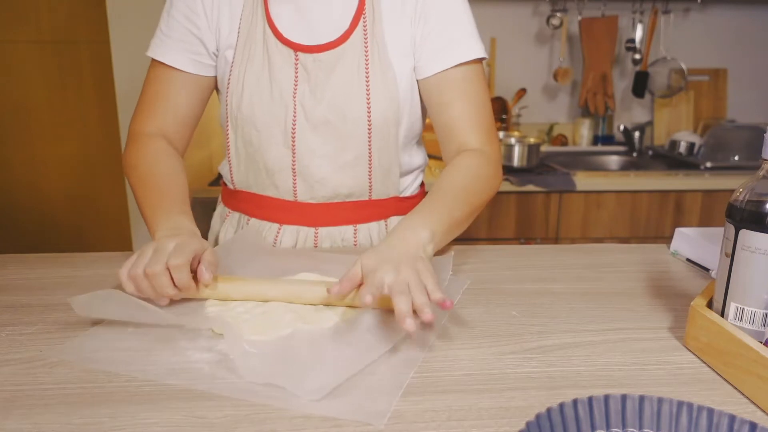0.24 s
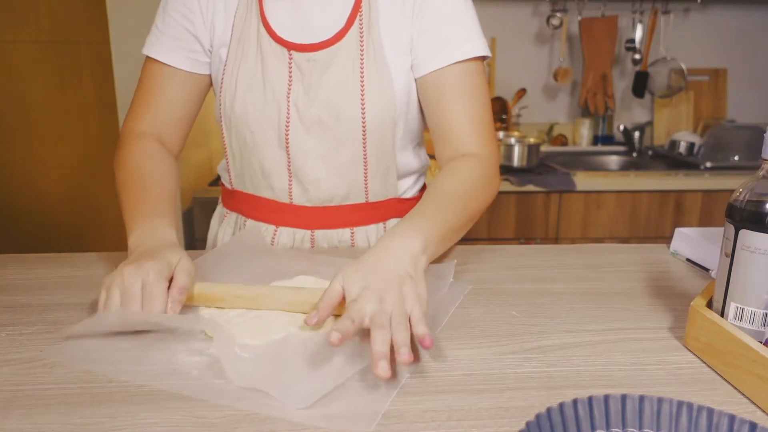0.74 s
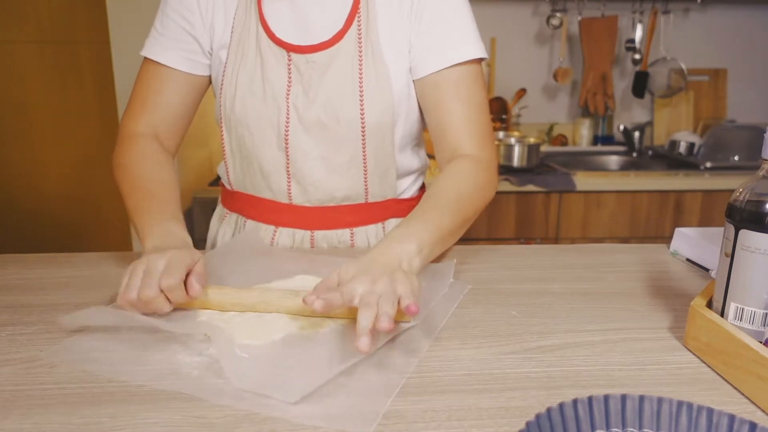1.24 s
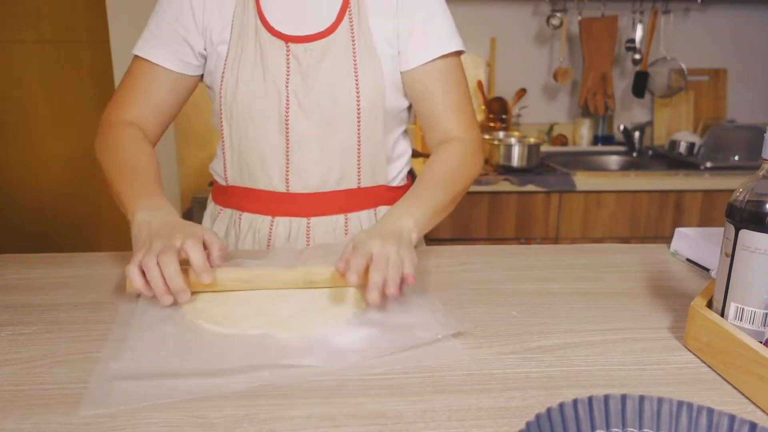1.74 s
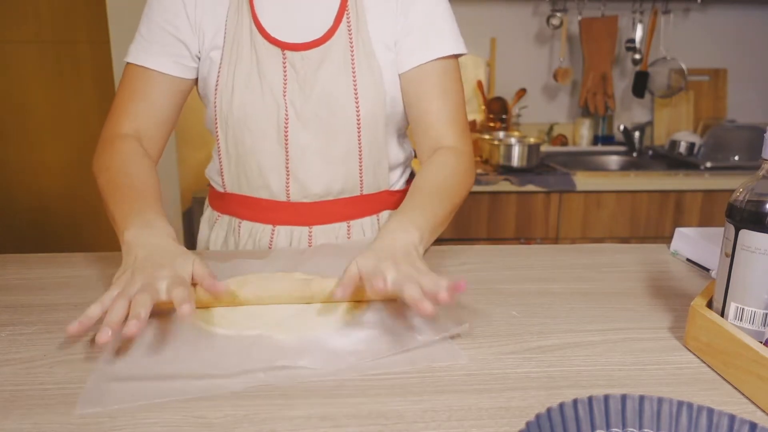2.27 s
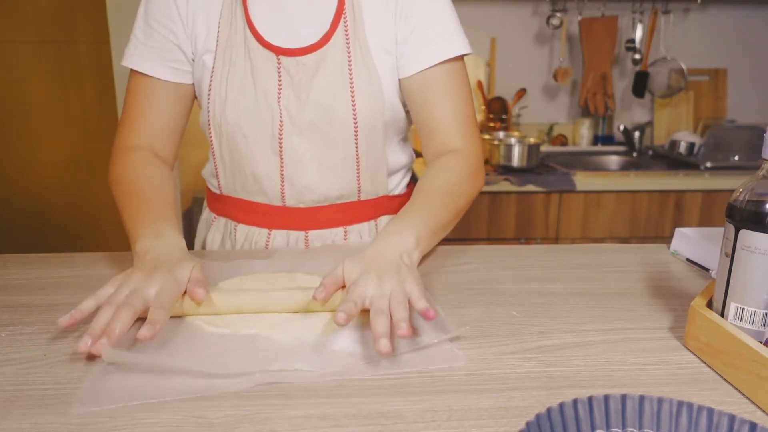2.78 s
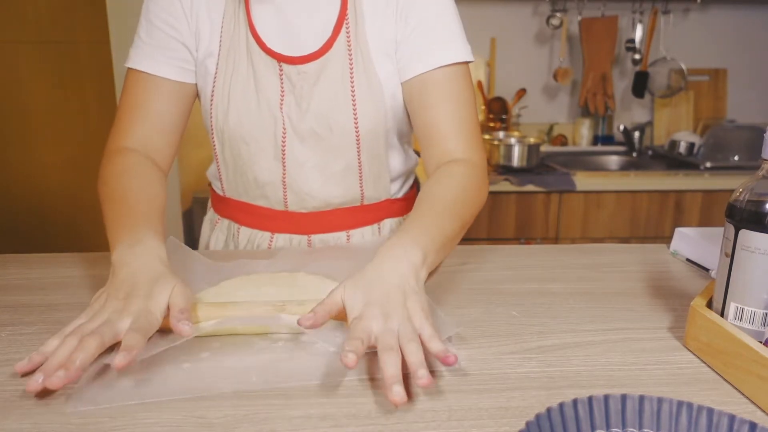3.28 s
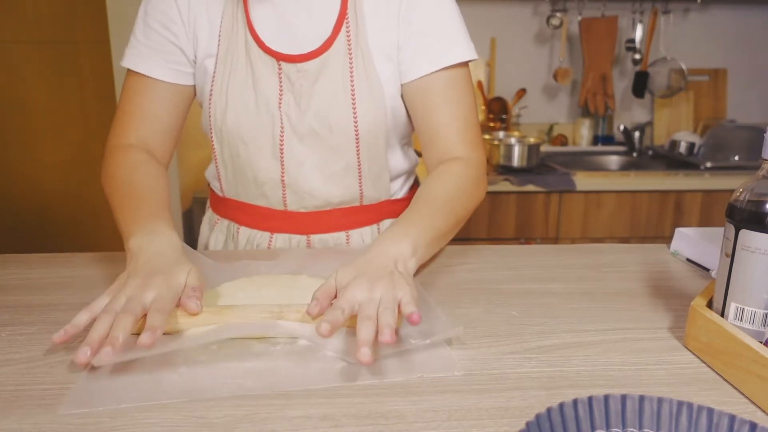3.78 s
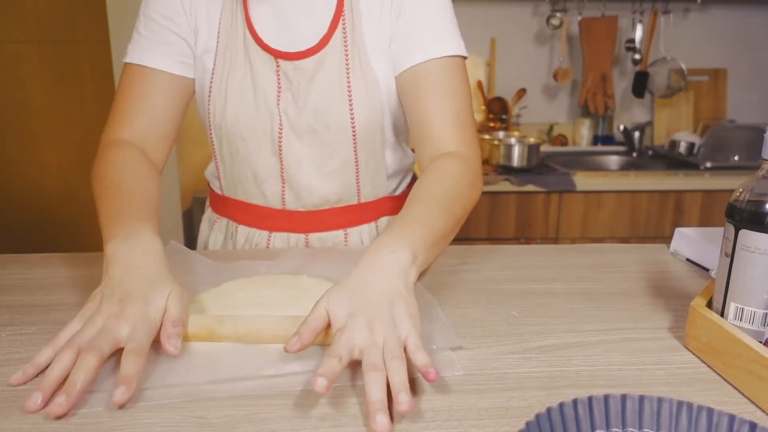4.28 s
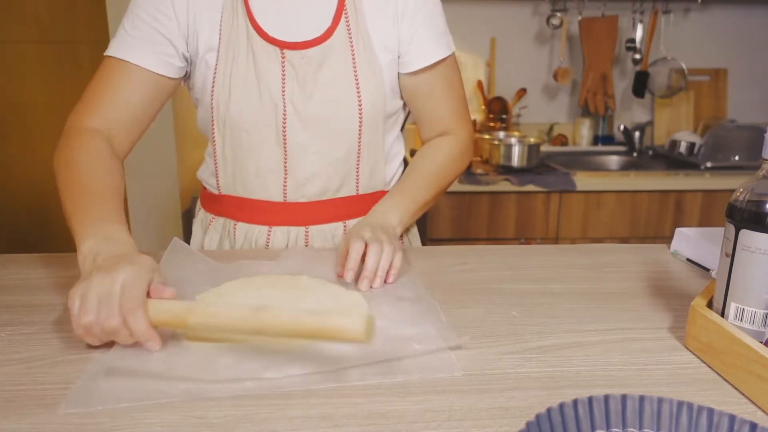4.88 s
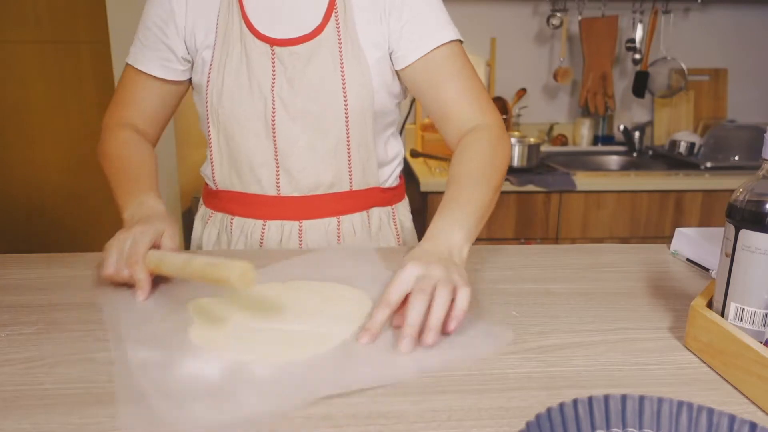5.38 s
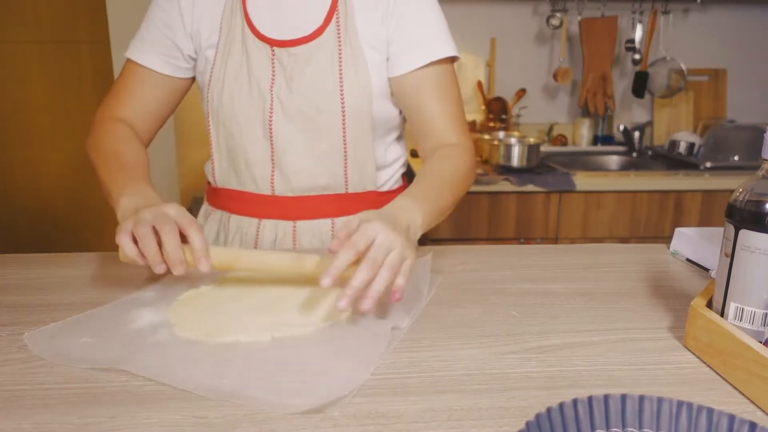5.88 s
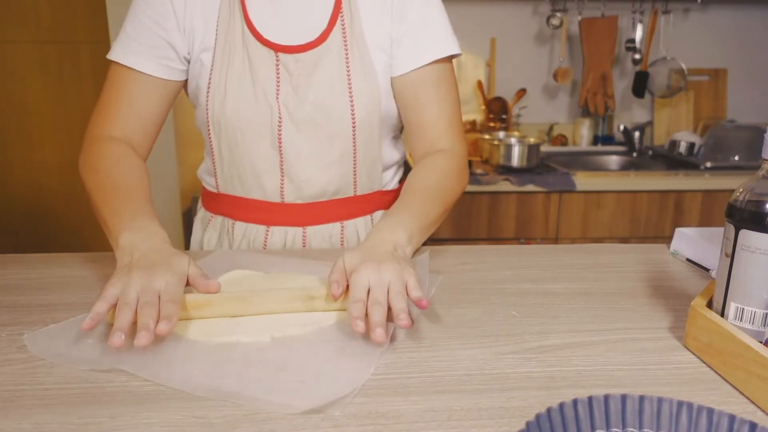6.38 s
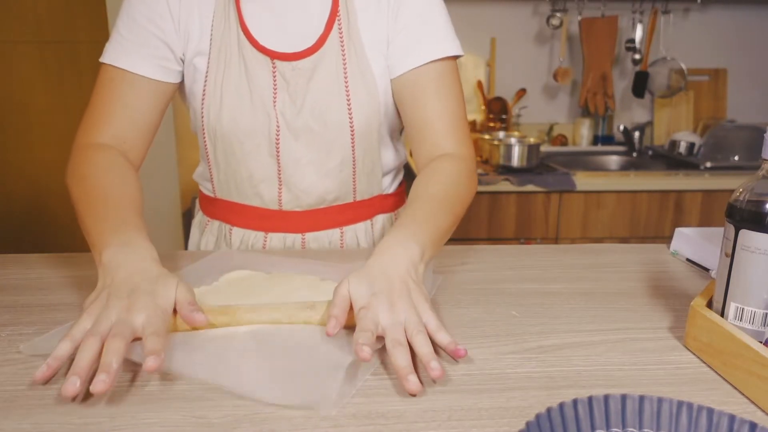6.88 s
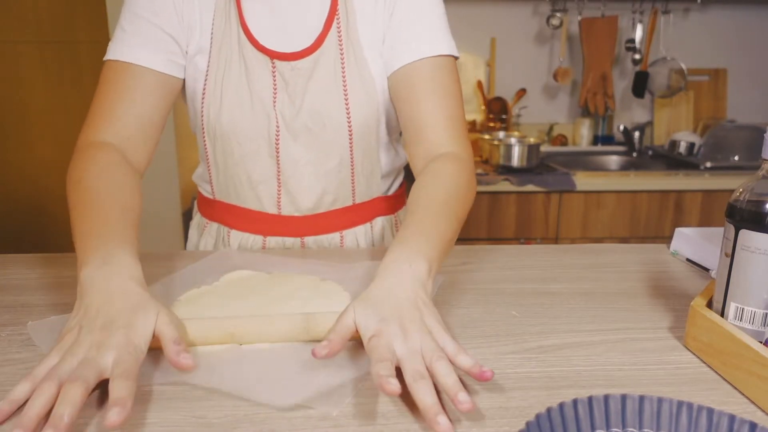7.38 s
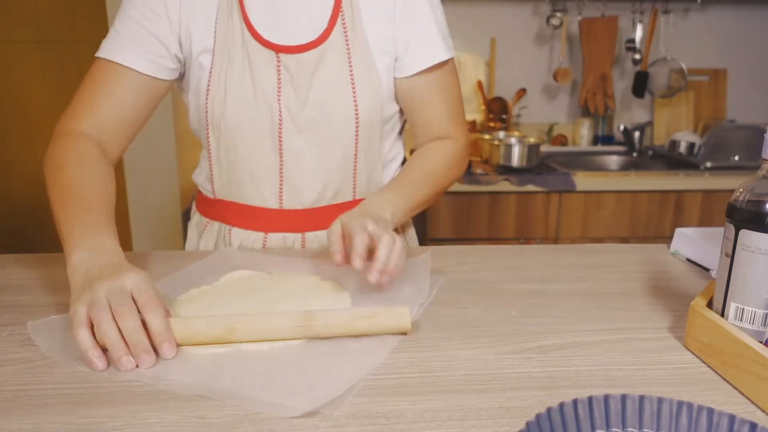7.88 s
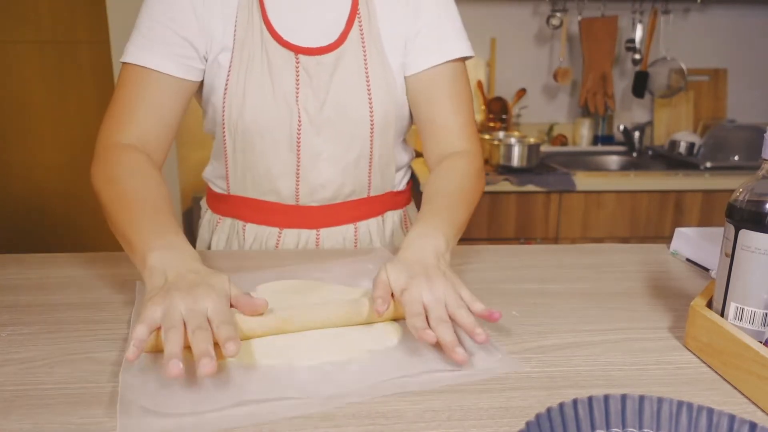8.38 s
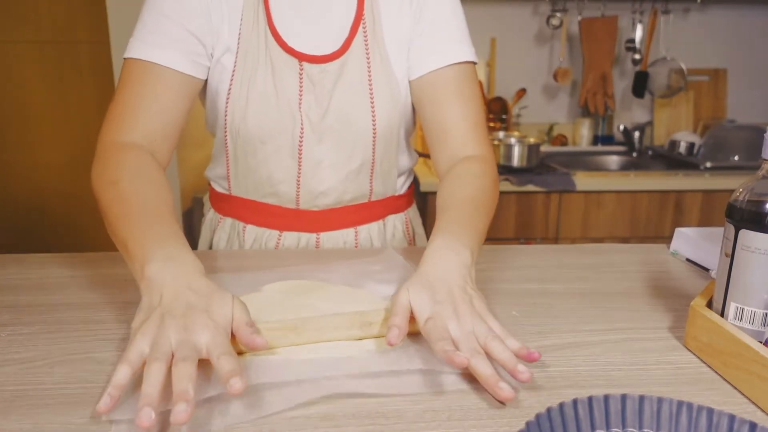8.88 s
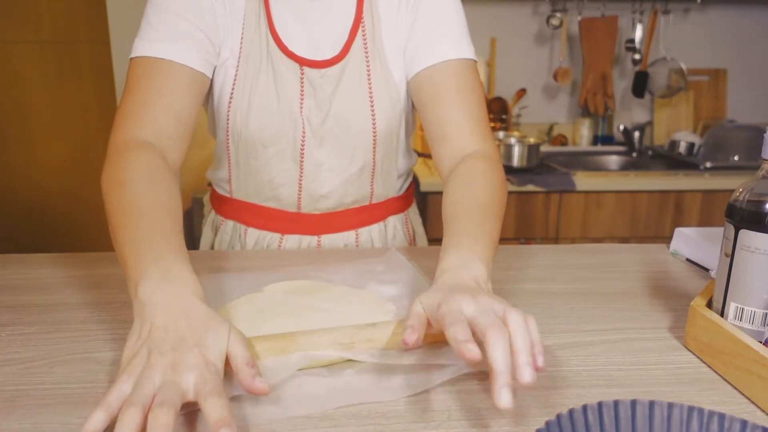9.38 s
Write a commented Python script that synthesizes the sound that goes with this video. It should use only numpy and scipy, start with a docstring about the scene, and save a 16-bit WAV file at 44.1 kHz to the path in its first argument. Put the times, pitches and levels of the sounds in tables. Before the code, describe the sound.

A wooden pin rolls over paper-covered dough in a small kitchen. Paper pops and crinkles in clusters with each push, with near pauses between. Dull padded thumps mark the pin being set down, then the sheet glides across the counter in a rising hiss. Rolling resumes with stronger snaps, a hard woody clack and a rattling stick-slip near the end. Close microphone, short room reflections, steady faint fridge hum underneath.

```python
"""On a kitchen counter, dough is rolled out between sheets of baking paper.
The paper crinkles from small creases, snaps as larger ones buckle, and hisses under hands and in a slide.
The wooden pin rings the counter as it lands, rings itself when knocked, and judders in short runs.
Reflections of a small live kitchen answer; steady filtered noise rumbles and a refrigerator hums in sines."""
import sys
import numpy as np
from scipy import signal
from scipy.fft import rfft, irfft
from scipy.io import wavfile

SR = 44100
rng = np.random.default_rng(int(sys.argv[2]) if len(sys.argv) > 2 else 0)


def int16_out(signal):
    """Quantize to a 16-bit WAV file."""
    q = np.round(np.clip(np.atleast_2d(signal).T, -1, 1) * 32767)
    wavfile.write(sys.argv[1], SR, q.astype(np.int16))


N = 425116
TIME = np.arange(N) / SR


def from_db(db):
    """Decibels to gain."""
    return np.exp(np.asarray(db) * np.log(10) / 20)


def rms_one(x):
    """Scale to an rms of 1."""
    return x / np.sqrt(np.mean(x ** 2) + 1e-20)


def at_hz(points, hz):
    """Read a spectrum on a log-frequency axis."""
    f, value = np.transpose(points)
    return np.interp(np.log(np.maximum(hz, 1)), np.log(f), value)


def butter(x, hz, kind, order=2):
    """Causal Butterworth filter."""
    edge_hz = np.clip(hz, 10, .48 * SR)
    sos = signal.butter(order, edge_hz, kind, fs=SR, output="sos")
    return signal.sosfilt(sos, x + 1e-18)


def colour(x, spectrum, size=8192):
    """Minimum-phase filter of the given spectrum: nothing sounds early."""
    bin_hz = np.arange(size // 2 + 1) * SR / size
    cepstrum = irfft(np.log(from_db(at_hz(spectrum, bin_hz))))
    # fold the cepstrum onto its causal half
    cepstrum[1:size // 2] *= 2
    cepstrum[size // 2 + 1:] = 0
    impulse = irfft(np.exp(rfft(cepstrum)))
    return signal.oaconvolve(x, impulse)[:len(x)]


def drift(rate_hz, size=32):
    """Slow chance with a spread of 1, drawn every size samples after a run-in."""
    slow = butter(rng.standard_normal(2 * N // size), rate_hz * size, "low")[N // size:]
    return np.interp(np.arange(N) / size, np.arange(len(slow)), rms_one(slow))


def add(out, start_s, sound):
    """Mix a sound in from start_s."""
    i = max(int(start_s * SR), 0)
    out[i:i + len(sound)] += sound[:N - i]


def decay(kicks, fall_s):
    """Each kick starts an exponential decay."""
    return signal.lfilter([1], [1, -np.exp(-1 / (fall_s * SR))], kicks + 1e-18)


def swell(top_s, rise_s, fall_s):
    """Grows towards top_s and dies away after it; top 1."""
    distance = np.maximum((top_s - TIME) / rise_s, (TIME - top_s) / fall_s)
    return np.exp(-np.minimum(distance, 20))


def ring(clicks, modes):
    """Clicks set decaying sines ringing, neighbours in opposite sign."""
    out = np.zeros(N)
    for k, (hz, db, t60_s) in enumerate(modes):
        r = np.exp(-np.log(1000) / (t60_s * SR))
        w = 2 * np.pi * hz / SR
        mode = signal.lfilter([0, np.sin(w)], [1, -2 * r * np.cos(w), r * r], clicks + 1e-18)
        out += (-1) ** k * from_db(db) * mode
    return out


def grains(per_s, spread_db, clump_db):
    """Tiny fibre slips at random times; their sizes are uneven and swell in clumps; rms 1."""
    out = np.zeros(N)
    born = np.flatnonzero(rng.random(N) < per_s / SR)
    chance = rng.laplace(size=N)[born]
    size_db = spread_db * np.minimum(np.abs(chance), 2.7)
    size_db += clump_db * np.tanh(drift(45)[born])
    out[born] = np.sign(chance) * from_db(size_db)
    return rms_one(out)


def facet(x, hz, width=1.9, order=1):
    """A patch of paper radiates a broad band, the higher the smaller it is."""
    band = butter(x, [hz / width, hz * width], "band", order=order)
    return butter(band, 706, "high")


# Pushes of the pin or a hand flexing the paper. Each row: top in seconds, relative level in dB,
# rise in seconds, fall in seconds, crispness (top over body) in dB.
FLEXES = [(0.0, -33.5, 0.037, 0.026, 9), (0.14, -40, 0.017, 0.027, 1), (0.82, -41, 0.089, 0.16, -2.5),
          (1.44, -37, .07, 0.019, -3), (1.27, -47, .025, 0.025, 4), (1.62, -47, .04, 0.019, 1),
          (1.735, -59, 0.0051, 0.041, -5), (2.0, -47, 0.085, 0.063, 0), (3.022, -35, 0.11, 0.12, 0),
          (3.62, -46.5, 0.024, .1, -8), (3.83, -28, 0.031, 0.054, -14), (4.131, -43.5, 0.12, 0.15, -5.5),
          (4.34, -44.5, 0.041, 0.09, -3), (4.74, -44.5, 0.029, 0.024, 14.5),
          (6.10, -49.5, 0.064, 0.067, -3.5), (6.49, -46, 0.021, 0.028, 1.5), (6.62, -43.5, 0.063, 0.2, 3.5),
          (6.89, -33.5, .05, 0.11, 1.5), (7.291, -33.5, 0.023, 0.015, -1.5), (7.771, -38, 0.0089, .03, 1),
          (7.93, -53, 0.017, 0.11, 15.5), (8.19, -40, 0.061, 0.025, -3.5), (8.47, -51, .06, 0.094, -1),
          (8.66, -45, 0.042, 0.02, -3.5), (8.77, -42, 0.03, 0.047, -5.5), (9.07, -35, 0.071, 0.065, 4.5),
          (9.28, -38.5, 0.054, 0.02, -7), (9.45, -44, 0.05, 0.034, -8), (9.63, -51, 0.019, .03, -2)]
# Hands resting on the pin, paper stirring. Each row: start in seconds, end in seconds.
PRESSES = [(0, 1.66), (1.72, 2.3), (2.76, 3.3), (3.6, 5.0), (5.98, 7.5), (7.76, 9.64)]
PRESS_RELATIVE_DB, PRESS_CRISP_DB = -61.5, 1


def flexing():
    """Stirring of the paper as gains of its body and crisp top; pushes add in power."""
    pressed = sum((TIME >= start_s) & (TIME < end_s) for start_s, end_s in PRESSES)
    body = from_db(PRESS_RELATIVE_DB) ** 2 * pressed
    top = body * from_db(PRESS_CRISP_DB) ** 2
    for top_s, db, rise_s, fall_s, crisp_db in FLEXES:
        power = (from_db(db) * swell(top_s, rise_s, fall_s)) ** 2
        body = body + power
        top = top + power * from_db(crisp_db) ** 2
    return np.sqrt(body), np.sqrt(top)


# Spectrum of crinkling paper. Each row: frequency in Hz, relative level in dB.
PAPER = [(240, -57), (400, -2), (730, -8.5), (949, -3), (1140, -0.5), (1380, -5), (1680, 2), (2150, -4.5),
         (2360, -3.5), (2880, -3), (5960, -5.5), (8760, -10.5), (14100, -22.5), (16000, -23)]


def crinkle(body, top, rubbing_db=-5.5, body_db=1.5, top_db=2.5):
    """Many small creases give way, each on a facet with its own brief ring, over fine rubbing."""
    ticks = 0
    for hz in np.geomspace(1100, 12000, 7):
        fibre_slips = grains(per_s=85, spread_db=5.0, clump_db=5.0)
        flutter = decay(np.abs(fibre_slips), fall_s=0.0021)
        band = facet(flutter * rng.standard_normal(N), hz, width=1.27)
        ticks = ticks + np.sqrt(hz) * rms_one(band)
    rubbing = from_db(rubbing_db) * rng.standard_normal(N)
    paper = colour(rms_one(ticks) + rubbing, PAPER)
    after_snap = settling()
    low = rms_one(butter(paper, 2930, "low", order=3))
    high = rms_one(butter(paper, 3700, "high", order=3))
    low *= from_db(body_db) * np.hypot(body, after_snap)
    high *= from_db(top_db) * np.hypot(top, after_snap)
    return low + high


# Creases snapping through at set times, loud ones and some faint ones. Each row: start in seconds,
# relative level in dB, centre in Hz, flutter relative to the crack in dB.
SNAPS = [(0.009, -14.5, 5070, -12), (0.036, -17, 2610, 3), (0.048, -17, 3260, 1.5), (0.45, -25, 2930, 2.5),
         (0.561, -22.5, 4100, 1), (0.676, -23.5, 2450, -12), (0.739, -6.5, 4100, -35),
         (0.794, -18, 6360, -10), (0.81, -18.5, 2760, -5), (0.836, -20, 4660, -2),
         (0.885, -13.5, 2200, -32), (1.013, -10, 4680, -15), (1.122, -33.5, 1710, -2),
         (1.233, -33, 2280, 14), (1.263, -26, 6200, -8), (1.316, -30, 2400, -12), (1.362, -17, 2840, -5.5),
         (1.375, -11.5, 5500, -11.5), (1.429, -14, 2700, -17), (1.439, -5, 3650, -23),
         (1.467, -3, 6050, -16), (1.479, -18, 6540, 4), (1.503, -16, 1870, -1.5), (1.953, -26, 3380, -4.5),
         (1.999, -22.5, 1620, -10), (2.121, -15.5, 2760, -22), (2.239, -21.5, 3430, -9),
         (2.593, -25, 3220, -24), (2.832, -15.5, 4020, -19), (2.923, -19, 4580, -2),
         (2.967, -11, 4000, -10), (3.1, -12.5, 5130, -9), (3.107, -8.5, 1530, -12), (3.129, -24, 1390, -9),
         (3.221, -11, 1700, -10), (3.205, -20, 4400, -9), (3.417, -19.5, 4000, -28.5),
         (3.601, -15.5, 5800, -16), (3.772, -27.5, 1590, 1), (3.803, -13.5, 1260, -11),
         (3.82, -11, 4700, -7), (3.849, -22, 1710, -9), (3.868, -13.5, 1650, -9), (3.916, -27, 2600, -9),
         (3.957, -16.5, 1150, -19), (3.976, -27, 1780, -1), (4.017, -29.5, 1590, 7), (4.117, -24, 1740, -5),
         (4.272, -7.5, 9600, -14), (4.332, -22, 3630, -11), (4.36, -28, 4400, -5), (4.516, -13, 3350, -8),
         (4.546, -22, 4100, -5), (4.593, -21.5, 6400, -3), (4.973, -20, 5430, -13), (5.022, -17, 6200, -14),
         (5.192, -19, 5000, -10), (5.868, -29.5, 4330, -11), (6.209, -31, 3080, 2),
         (6.314, -34.5, 3440, -5), (6.392, -16, 3450, -11), (6.416, -23.5, 6200, -7),
         (6.488, -26, 6000, -8), (6.553, -18.5, 4420, -9), (6.585, -17, 3370, -2), (6.628, -19, 7490, -12),
         (6.647, -15.5, 4830, -3), (6.707, -18.5, 3400, -6), (6.818, -2.5, 2020, -14),
         (6.841, -12.5, 1830, -6), (6.898, -8, 3100, -8.5), (6.945, -10, 4380, -13), (6.967, -23, 1860, -1),
         (7.147, -5, 6300, -30), (7.166, -9, 7200, -11), (7.235, -24, 4300, 2), (7.29, -17, 4000, -15),
         (7.311, -26, 4900, -12), (7.344, -19, 3880, -1.5), (7.376, -11.5, 5200, -13),
         (7.427, -13.5, 2770, -20), (7.479, -26, 1700, -3.5), (7.911, -23, 6300, -6),
         (8.03, -12.5, 6600, -21), (8.201, -18.5, 2850, 1), (8.26, -14, 1910, -15), (8.348, -15, 6900, -26),
         (8.391, -23.5, 2800, -11), (8.42, -21.5, 2980, -13), (8.454, -11.5, 3500, -15),
         (8.471, -16, 2020, -9), (8.658, -26.5, 1830, -6), (8.774, -20, 1610, -7.5),
         (8.896, -6.5, 4960, -11.5), (8.994, -16.5, 1680, 0.5), (9.027, -9, 4700, -16),
         (9.062, -12, 1640, -5), (9.1, -9.5, 2620, -6.5), (9.14, -6, 2400, -10), (9.569, -19.5, 3840, -16)]


def snaps(stir, crack_s=0.00018, level_db=-3.5, edge_db=-4.5, edge_hz=5500, edge_follows=.4, count=400):
    """A crease buckles with a sharp crack, then its facet flutters for a few milliseconds."""
    out, t = np.zeros(N), TIME[:1024]
    median_hz = np.median(np.array(SNAPS)[:, 2])
    rattles = np.sign(rng.standard_normal((count, 2, len(t))))
    for (s, db, hz, flutter_db), rattle in zip([*SNAPS, *lesser_snaps(stir)], rattles):
        shape = np.exp(-t / crack_s) + from_db(flutter_db) * np.exp(-t / .0022)
        body, edge = rattle * shape
        # a smaller facet also has a higher bright edge
        bright = facet(edge, edge_hz * (hz / median_hz) ** edge_follows, width=1.75)
        crack = rms_one(facet(body, hz, width=1.65, order=2)) + from_db(edge_db) * rms_one(bright)
        # soft limit on each snap's peaks
        limited = 2 * np.tanh(crack * np.sqrt(np.mean(shape ** 2)) / 2)
        add(out, s, from_db(db + level_db) * limited)
    return out


# Chance snaps: levels are on the relative scale of SNAPS; spreads are standard deviations.
LESSER_PER_S, LESSER_ABOVE_STIR_DB, LESSER_SPREAD_DB, LESSER_TOP_DB = 16, 16, 1, -17
LESSER_CENTRE_HZ, LESSER_SPREAD_OCTAVES, LESSER_FLUTTER_DB = 2700, 0.86, -13


def lesser_snaps(stir, count=300):
    """Chance snaps whose strength follows the stirring of the paper; rows like those of SNAPS."""
    when, luck = rng.random((count, 2)).T
    size, pitch = rng.uniform(-1, 1, (count, 2)).T * np.sqrt(3)
    at = (when * N).astype(int)
    db = 20 * np.log10(stir[at]) + LESSER_ABOVE_STIR_DB + LESSER_SPREAD_DB * size
    db = np.minimum(db, LESSER_TOP_DB)
    hz = LESSER_CENTRE_HZ * 2 ** (LESSER_SPREAD_OCTAVES * pitch)
    rows = np.column_stack([at / SR, db, hz, np.full(count, LESSER_FLUTTER_DB)])
    return rows[luck < LESSER_PER_S * N / SR / count]


def settling(below_snap_db=-32, fall_s=0.025):
    """Each listed snap sets off a brief run of crinkling; a gain."""
    kicks = np.zeros(N)
    for s, db, *_ in SNAPS:
        add(kicks, s, from_db([db + below_snap_db]))
    return decay(kicks, fall_s)


def dip_before_snaps(dip_db=-6.5, dip_s=0.008):
    """Crinkling dips just before each listed snap, so its attack stands clear; a gain."""
    next_snap = np.append(np.sort(np.array(SNAPS)[:, 0]), np.inf)
    wait_s = next_snap[np.searchsorted(next_snap, TIME)] - TIME
    return from_db(dip_db * np.exp(-wait_s / dip_s))


# Hands brushing and crushing the paper. Each row: top in seconds, relative level in dB, rise in seconds,
# fall in seconds, centre in Hz.
BRUSHES = [(.03, -35.5, 0.024, 0.15, 3620), (0.739, -32.5, 0.0018, 0.0057, 4350),
           (1.445, -34, 0.0079, 0.011, 4500), (1.7202, -22, 0.0011, 0.0077, 4900),
           (2.995, -30.5, 0.021, 0.019, 3500), (3.744, -26.5, 0.0038, 0.0085, 2230),
           (3.822, -20.5, 0.005, 0.037, 4800), (3.86, -35, 0.0066, 0.012, 3560),
           (4.663, -27.5, 0.0087, 0.016, 4800), (4.722, -35, 0.003, 0.005, 4560),
           (4.748, -25, 0.0053, 0.023, 5270), (5.50, -40, 0.023, 0.017, 1210),
           (5.978, -29, 0.0019, 0.028, 3930), (6.814, -23, 0.0075, 0.0085, 4130),
           (6.882, -26, 0.0049, 0.0093, 4000), (7.034, -25.5, .006, 0.035, 3530),
           (7.777, -27, 0.0029, 0.0041, 4530), (7.924, -24, 0.011, 0.027, 5700),
           (9.065, -22.5, 0.011, 0.027, 3050), (9.30, -37.5, 0.16, 0.029, 2680)]


def brushes(level_db=-2.0):
    """A palm lands or drags: a short swell of dense grains."""
    out = np.zeros(N)
    rub = grains(per_s=7000, spread_db=2.8, clump_db=1.8)
    for top_s, db, rise_s, fall_s, hz in BRUSHES:
        near = slice(max(int((top_s - .1) * SR), 0), int((top_s + .2) * SR))
        t = TIME[near] - top_s
        shape = np.exp(-np.where(t < 0, -t / rise_s, t / fall_s))
        grain = rms_one(butter(facet(rub[near], hz, width=2.53), 1.62 * hz, "low"))
        out[near] += from_db(db + level_db) * shape * grain
    return out


# Spectrum of paper gliding on the counter. Each row: frequency in Hz, relative level in dB.
FRICTION = [(410, -29), (700, -35), (1090, -7), (1330, -13), (1680, -4.5), (1970, -5.5), (3890, -1),
            (8100, -1.5), (13900, -9), (16000, -17)]
SLIDE_START_S, SLIDE_STOP_S, SLIDE_ATTACK_S, SLIDE_RELEASE_S = 4.922, 5.528, 0.062, 0.05
SLIDE_START_DB, SLIDE_GAIN_DB_PER_S = -40, 4


def slide(patchy_db=1.0):
    """Paper glides on the counter: slips merge into a hiss whose dull and bright parts drift apart."""
    hiss = rms_one(colour(grains(per_s=24000, spread_db=1.5, clump_db=1.1), FRICTION))
    dull = butter(hiss, 5400, "low", order=1)
    bright = hiss - dull
    hiss = dull * from_db(patchy_db * drift(6.7)) + bright * from_db(patchy_db * drift(2.8))
    moving_s = np.clip(TIME, SLIDE_START_S, SLIDE_STOP_S) - SLIDE_START_S
    stopped_s = np.clip(TIME - SLIDE_STOP_S, 0, 1)
    shape = (1 - np.exp(-moving_s / SLIDE_ATTACK_S)) * np.exp(-stopped_s / SLIDE_RELEASE_S)
    return hiss * shape * from_db(SLIDE_START_DB + SLIDE_GAIN_DB_PER_S * moving_s)


# The pin landing on the padded counter. Each row: start in seconds, relative level in dB,
# low-pass of the first contact in Hz, time between bounces in seconds.
THUMPS = [(1.722, -37.5, 400, .036), (1.759, -41, 130, 0.018), (2.503, -31, 1210, 0.018),
          (3.603, -34, 440, 0.038), (3.617, -34, 650, .036), (5.975, -41, 120, .02),
          (6.10, -45.5, 605, 0.019)]
# Modes of the counter. Each row: frequency in Hz, relative level in dB, t60 in seconds.
COUNTER = [(93.5, -4.5, 0.3), (112, -11, 0.27), (154, -10.5, 0.33), (167.3, 2.5, 0.19), (227, -12.5, 0.35),
           (275, 2, 0.071), (344, 0.5, 0.078), (395, -8.5, 0.18), (513, -3, 0.066), (557, -10.5, 0.16),
           (700, 8.5, 0.019), (1020, 3.5, 0.032), (1360, 7, 0.013), (2330, 3, .008)]


def thumps(contacts=3, bounce_loss_db=5, bounce_softening=0.91):
    """Dough softens the landing, so mostly low counter modes ring; each bounce is weaker and duller."""
    force = np.zeros(N)
    for s, db, hz, gap_s in THUMPS:
        for k in range(contacts):
            contact = butter(signal.unit_impulse(2048), hz * bounce_softening ** k, "low", order=1)
            add(force, s + k * gap_s, from_db(db - k * bounce_loss_db) * contact)
    return butter(ring(force, COUNTER), 70, "high", order=3)


def thuds(level_db=-10, delay_s=0.042, rise_s=0.018, fall_s=0.045, low_hz=66.6, high_hz=134):
    """Dough squashes under each landing: a dull, unpitched swell that peaks just after contact."""
    shape = sum(from_db(db + level_db) * swell(s + delay_s, rise_s, fall_s) for s, db, *_ in THUMPS)
    noise = rms_one(butter(rng.standard_normal(N), high_hz, "low", order=3))
    return butter(shape * noise, low_hz, "high", order=4)


# Bare wood knocks of the pin. Each row: start in seconds, relative level in dB.
KNOCKS = [(2.503, -35), (3.2215, -42.5), (7.562, -30), (7.564, -12.5), (7.568, -20.5)]
# Modes of the pin. Each row: frequency in Hz, relative level in dB, t60 in seconds.
PIN = [(294, -18, 0.044), (440, -21, 0.12), (619, -4.5, 0.036), (697, -5, 0.024), (840, -12, 0.069),
       (1020, 0, 0.014), (1330, 1.5, 0.0066), (1760, 6, 0.0091), (2080, 1, 0.0064), (2250, -11, 0.021),
       (3040, -7, 0.0074), (4300, -16, 0.021)]
# Modes of the held pin rocking on the dough. Each row: frequency in Hz, relative level in dB, t60 in seconds.
ROCKING = [(314, -10, 0.053), (395, -3.5, 0.061), (451, 2, 0.035), (1230, -10, 0.039), (2000, -23, .015),
           (2800, -5, 0.024)]


def strike(events, modes):
    """Hard, short contacts on a set of modes; the slim pin radiates no bass."""
    force = np.zeros(N)
    for s, db in events:
        add(force, s, from_db([db]))
    return butter(ring(force, modes), 147, "high")


# The pin sticking and slipping at the end of a stroke. Each row: start in seconds, relative level in dB,
# fading in dB per second.
JUDDERS = [(9.19, -21.5, 1205), (9.241, -26, 250), (9.288, -25.5, 201)]


def slips(count=6, mean_gap_s=.013):
    """Each judder is a run of unevenly spaced stick-slips that fade: rows (s, dB)."""
    rows = []
    for s, db, fading_db_per_s in JUDDERS:
        gaps_s = mean_gap_s * rng.uniform(.5, 1.5, count)
        rows += [(s + t, db - fading_db_per_s * t) for t in np.cumsum(gaps_s) - gaps_s[0]]
    return rows


# Strength of the kitchen's reflections. Each row: frequency in Hz, relative level in dB.
WALLS = [(80, -11), (300, 1.5), (1000, -8), (2000, -7.5), (5000, -7.5), (9000, -11.5), (16000, -3)]
# Decay of the kitchen. Each row: frequency in Hz, t60 in seconds.
DECAY = [(100, 0.73), (1000, 0.58), (4000, 0.6), (8000, 0.71), (16000, 0.42)]


def kitchen(x, first_wall_s=0.00095):
    """Dense reflections build up quickly; each band dies at its own rate."""
    t, tail = TIME[:32768], 0
    edges_hz = np.geomspace(50, 18000, 10)
    for low, high in zip(edges_hz, edges_hz[1:]):
        hz = np.sqrt(low * high)
        shape = from_db(-60 * t / at_hz(DECAY, hz)) * (1 - np.exp(-(t / first_wall_s) ** 2))
        band = butter(rng.standard_normal(len(t)), [low, high], "band")
        tail = tail + from_db(at_hz(WALLS, hz)) * band * shape / np.linalg.norm(shape)
    return signal.oaconvolve(x, tail)[:N]


# Refrigerator tones. Each row: frequency in Hz, rms in dB before waver and swell.
HUM = [(60, -75.5), (98, -63), (120, -60.5), (147, -64.5), (196, -62.5)]
# Swell of the hum. Each row: time in seconds, gain in dB.
HUM_SWELL = [(0, -4.5), (8.0, 1), (8.2, 4), (9.64, 1.5)]


def hum(waver_db=1.4):
    """Motor and mains tones that waver slightly in strength."""
    tones = 0
    for hz, db in HUM:
        level = from_db(db + waver_db * drift(1.8))
        tones = tones + level * np.sin(2 * np.pi * (hz * TIME + rng.random()))
    return np.sqrt(2) * tones * from_db(np.interp(TIME, *np.transpose(HUM_SWELL)))


# Spectrum of the kitchen's background. Each row: frequency in Hz, relative level in dB.
RUMBLE = [(15, -93.5), (25, -58.5), (92, -7), (166, -4), (195, -4.5), (285, -8.5), (516, -15), (659, -14.5),
          (754, -20), (1040, -15), (1130, -23), (1370, -16.5), (2160, -27.5), (3920, -26.5), (16000, -43)]


def rumble(rms_db=-51):
    """Low, steady background of the kitchen: coloured noise after a 1 s run-in."""
    noise = colour(rng.standard_normal(N + SR), RUMBLE)[SR:]
    return from_db(rms_db) * rms_one(noise)


# Diffuse air, opposite in the two sides. Each row: frequency in Hz, gain on unit white noise in dB.
AIR = [(40, -56), (200, -41.5), (500, -49.5), (1400, -50), (2200, -59.5), (3200, -78), (16000, -97)]


def air():
    """Diffuse air that differs between the sides: coloured noise."""
    return colour(rng.standard_normal(N), AIR)


# The foreground dips briefly.
HUSH_FROM_S, HUSH_TO_S, HUSH_DB = 1.662, 1.717, -16


def scene(paper_room_db=1.0, counter_room_db=-1.0, pin_room_db=0.0, room_side_db=-20.0, crack_side_db=-25.5):
    """The work is straight ahead of a narrow stereo pair, so the sides differ only a little."""
    body, top = flexing()
    cracks = butter(snaps(np.sqrt(body * top)), 12100, "low")
    counter = thumps() + thuds()
    pin = strike(KNOCKS, PIN) + strike(slips(), ROCKING)
    paper = [crinkle(body, top) * dip_before_snaps(), cracks, brushes() + slide()]
    work = sum(paper) + counter + pin
    # each paper layer, and the counter with the pin, has its own paths to the walls
    room = from_db(paper_room_db) * sum(kitchen(part) for part in paper)
    room += kitchen(from_db(counter_room_db) * counter + from_db(pin_room_db) * pin)
    hush = from_db(HUSH_DB * ((TIME > HUSH_FROM_S) & (TIME < HUSH_TO_S)))
    mid = (work + room) * hush + rumble() + hum()
    # low-passed reverb, delayed by 11 ms, widens the low end slightly
    late = np.pad(room, (SR // 90, 0))[:N]
    side = from_db(room_side_db) * butter(late, 870, "low", order=3)
    side += air()
    # cracks get a slight, randomly varying difference between left and right
    side += from_db(crack_side_db) * drift(42.4) * cracks
    return np.array([mid + side, mid - side])


def record(dry, cutoff_hz=16100):
    """The top is cut steeply."""
    sos = signal.ellip(10, .2, 80, cutoff_hz, fs=SR, output="sos")
    return signal.sosfilt(sos, dry)


dry = scene()
out = record(dry)
int16_out(out)
```